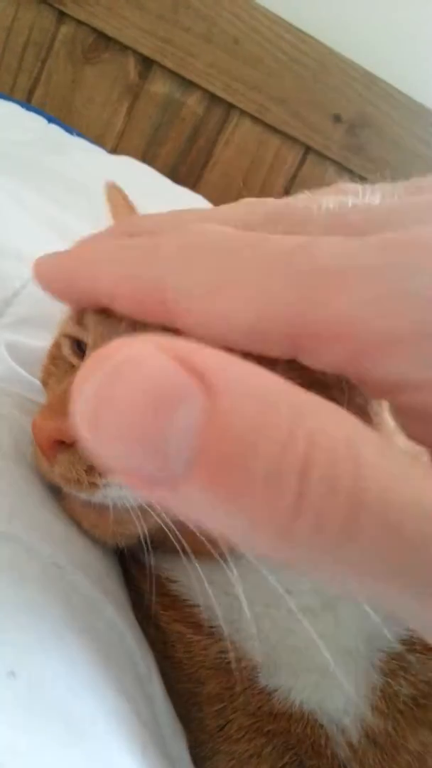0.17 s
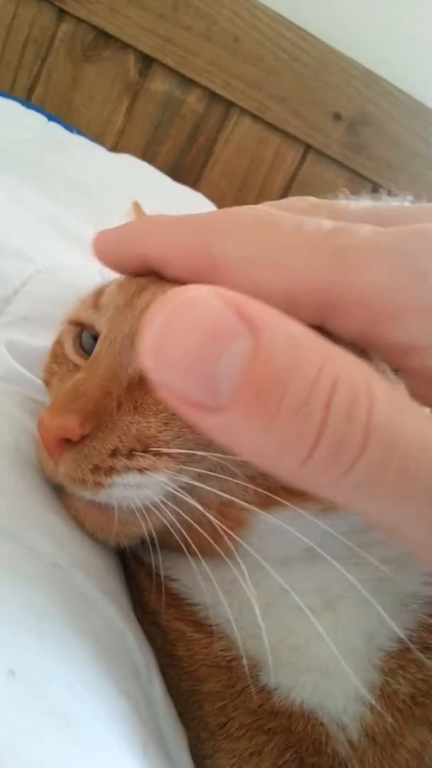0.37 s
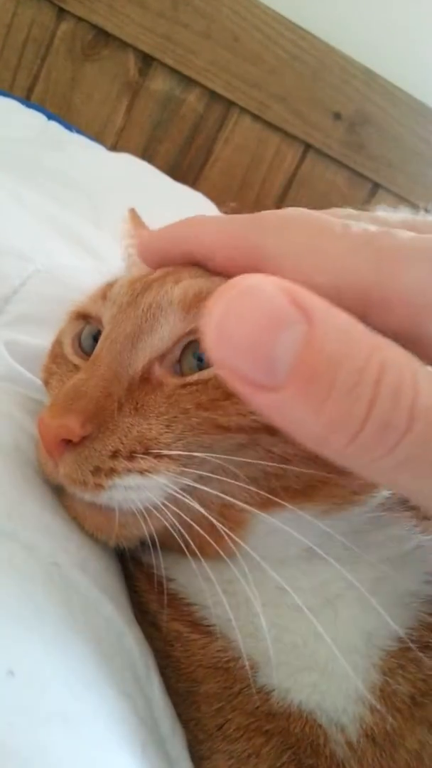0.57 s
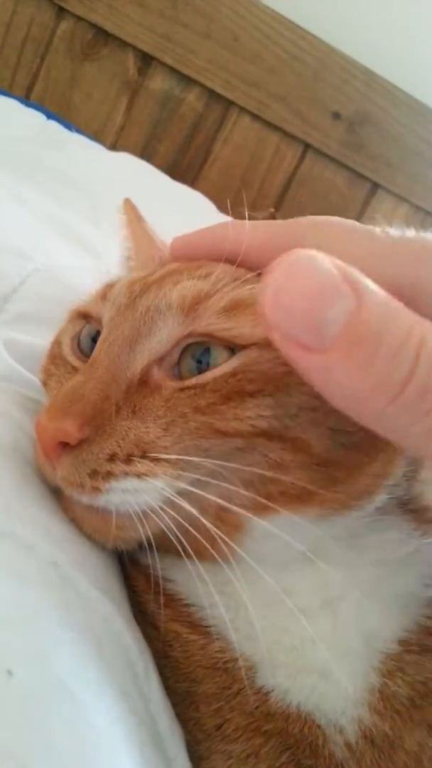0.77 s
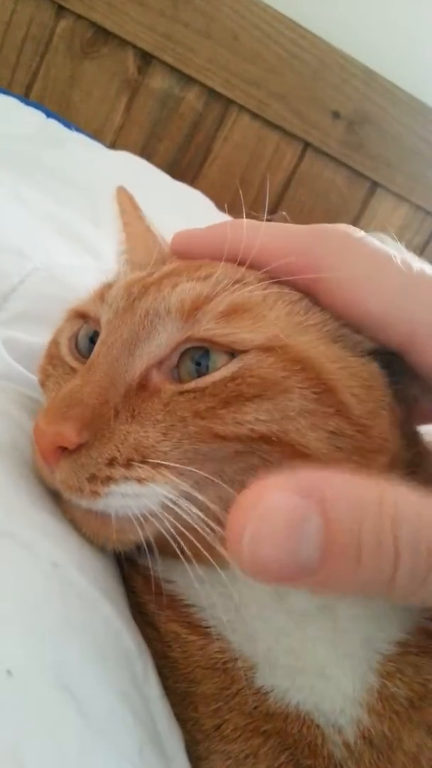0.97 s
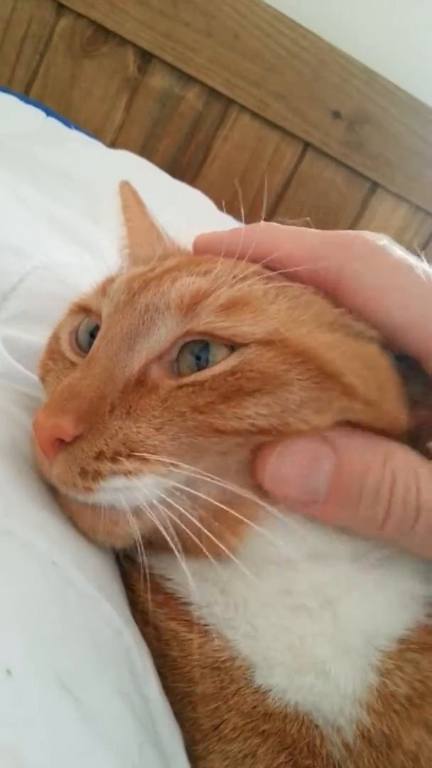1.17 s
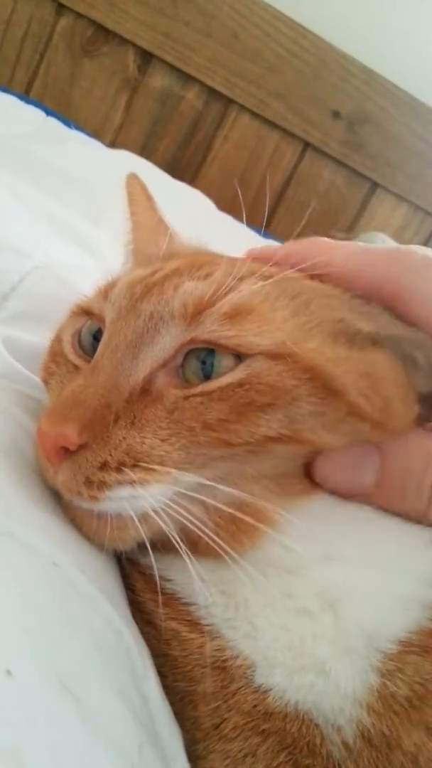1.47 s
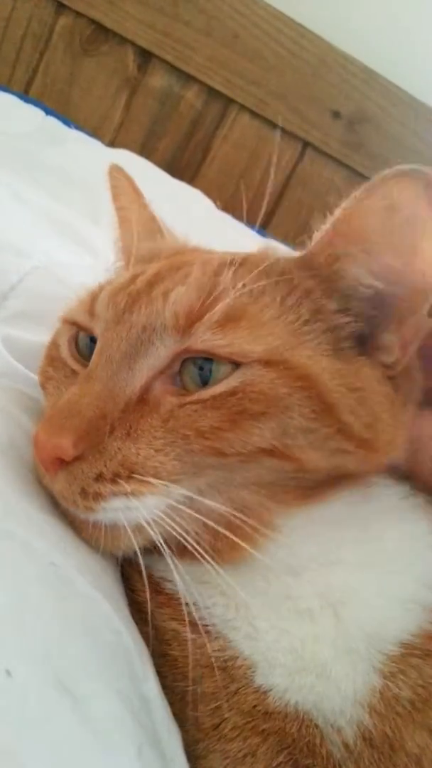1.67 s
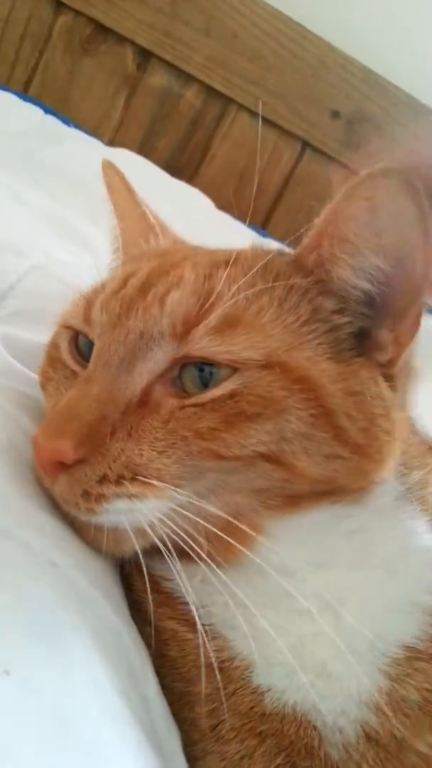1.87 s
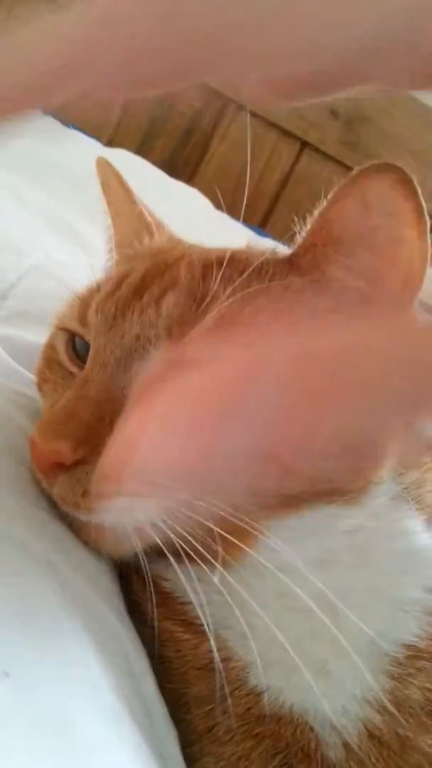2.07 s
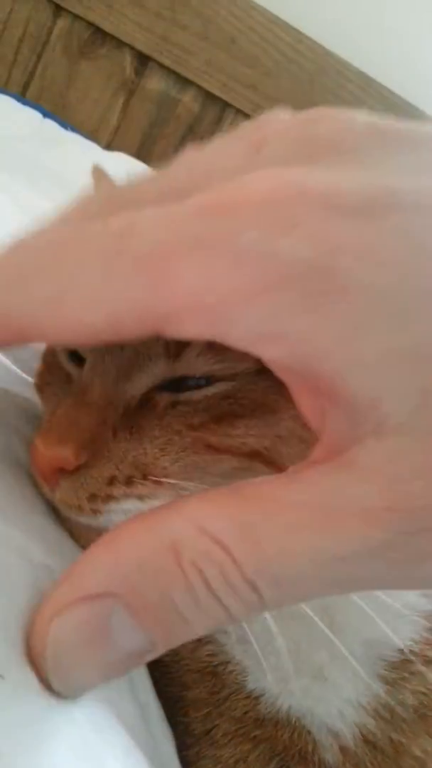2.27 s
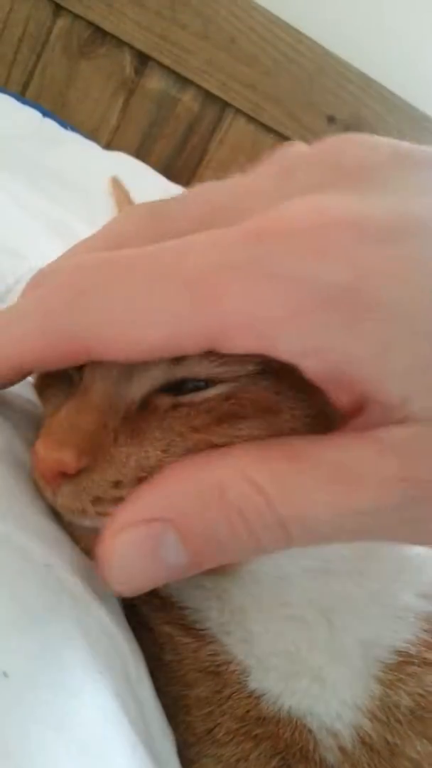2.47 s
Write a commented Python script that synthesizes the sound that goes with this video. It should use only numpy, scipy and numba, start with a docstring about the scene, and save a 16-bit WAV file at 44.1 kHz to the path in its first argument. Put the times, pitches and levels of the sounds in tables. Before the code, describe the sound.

Very close fur stroking indoors on a bed, almost all in the left channel: scratchy rustle over a soft skin rub, crackling clicks early, a sparser middle, then renewed rubbing, with faint low handling rumble and hiss.

```python
"""A close, dry rustle of fur comes first, at the left: a hand strokes a cat's head on a bed, brushing that port.
Dense hair slips make the rustle and a lower skin rub, both swelling and thinning with the strokes.
Single hairs tick as resonant pulses, a few snap and ring the casing; the rubbing also gives short low thumps,
murmurs and a squeak, made as decaying tones that sink in pitch.
The right port hears a faint share of this; under it lie handling rumble, a low hum, port hiss and a light brush."""
import sys
import numpy as np
from scipy import signal
from scipy.fft import rfft, irfft
from scipy.io import wavfile
from numba import njit

SR = 44100
rng = np.random.default_rng(int(sys.argv[2]) if len(sys.argv) > 2 else 0)


def dump(signal):
    """Clip the signal to [-1, 1] and save it as 16-bit WAV at the path in sys.argv[1]."""
    limited = np.clip(np.atleast_2d(signal).T, -1, 1)
    pcm = np.round(limited * 32767).astype(np.int16)
    wavfile.write(sys.argv[1], SR, pcm)


N = 114660  # samples, 2.6 s

# Strokes of the hand, before the two trims: time_s, rustle_level_db, skin_level_db
STROKES = [(0.0, -42.5, -51), (0.036, -49, -63), (0.1, -40, -53), (0.144, -38.5, -47.5), (0.192, -41, -53),
           (0.208, -35, -45), (0.255, -48, -56), (0.315, -33, -41), (0.359, -55.5, -56),
           (0.371, -47.5, -52.5), (0.423, -49.5, -63.5), (0.451, -45.5, -55), (0.463, -41, -30.5),
           (0.479, -46.5, -49.5), (0.507, -45.5, -63), (0.539, -41.5, -57), (0.559, -35, -38),
           (0.591, -36, -46), (0.643, -58, -62.5), (0.662, -55, -69), (0.694, -34.5, -40.5),
           (0.738, -43, -53), (0.794, -30, -35.5), (0.854, -45, -58.5), (0.874, -53, -51),
           (0.902, -41.5, -52.5), (0.934, -31.5, -41.5), (0.974, -44.5, -59), (1.002, -42.5, -69),
           (1.026, -39, -41.5), (1.06, -42, -53.5), (1.09, -59, -85), (1.117, -41, -56.5),
           (1.209, -36.5, -46), (1.27, -49, -57), (1.297, -44.5, -64), (1.345, -47.5, -72),
           (1.397, -43.5, -52), (1.405, -43, -37.5), (1.413, -47.5, -49), (1.449, -55.5, -65),
           (1.465, -47.5, -62), (1.513, -64, -79), (1.548, -46, -59.5), (1.578, -53.5, -64),
           (1.594, -38.5, -57), (1.652, -37, -48), (1.716, -44, -61), (1.75, -38.5, -54), (1.789, -33, -58),
           (1.806, -36.5, -43.5), (1.845, -43.5, -55.5), (1.885, -37.5, -46), (1.925, -44.5, -55),
           (1.99, -39.5, -50), (2.05, -42, -54), (2.09, -34.5, -42.5), (2.14, -39.5, -48),
           (2.172, -32, -37.5), (2.22, -38, -47), (2.275, -32.5, -40), (2.3, -34.5, -44),
           (2.375, -44.5, -55.5), (2.43, -48.5, -57), (2.5, -44.5, -56.5), (2.55, -41.5, -46),
           (2.598, -43.5, -52.5)]
FUR_TRIM_DB, SKIN_TRIM_DB = -0.5, 1.5
# Tiny hair slips; each is louder than the least by a random amount with this scale
SLIPS_PER_S, SLIP_SPREAD_DB = 8000., 4.5
# Unsteady catching shared by fur and skin, and a further judder of the skin (rates in wander points per s)
CATCH_DB, CATCH_RATE = 2.0, 130.
JUDDER_DB, JUDDER_RATE = 2.5, 70
# Colours of the fur rustle and of the skin rub: freq_hz, density_db (relative, per Hz)
FUR_COLOUR = [(700, -28.5), (1300, -8.5), (1900, -2.5), (2600, -1), (4000, -3), (6200, -1), (7500, -6.5),
              (9000, -14.5), (12000, -18.5), (14500, -32)]
SKIN_COLOUR = [(30, -17.5), (90, -1.5), (200, -2), (380, 1), (650, -3.5), (900, -4), (1400, -4.5),
               (2500, -4.5), (6000, -36.5)]
# Small air gaps squeezed by the rubbing: pitch_hz, level_db
AIR_GAPS = [(3100, -7.5), (4000, -3.5), (5800, -6)]
GAP_Q, GAP_DRIFT, AIR_RATE = 7.2, 0.13, 12  # drift as log pitch; wander points per s
# Hollow of the cupped hand, its share against the fur: time_s, level_db
CUP_SHARE = [(0, -33), (1.5, -10), (1.7, -12), (1.85, -0.5), (2.1, -3), (2.28, -11), (2.6, -12)]
# Resonances of that hollow: pitch_hz, q, level_db
CUP_MODES = [(612, 9.9, -8.5), (1360, 3.3, -10), (2310, 3.4, 1.5)]
# Treble hiss of the rubbing against the fur: time_s, level_db
SHEEN_LEVEL = [(.45, -9), (.62, -8.5), (.95, -11.5), (1.2, -8), (1.6, -7), (1.9, -43), (2.2, -10),
               (2.6, -6)]
# Colour of that hiss: freq_hz, density_db (relative, per Hz)
SHEEN_COLOUR = [(3500, -41), (6800, 3), (9000, 0), (12000, -4), (14500, -10.5)]
# Lesser hair ticks scattered through the rustle; level is the peak against the rustle
CRACKLES_PER_S, CRACKLE_DB, CRACKLE_HZ = 70., 14.5, 5360

# Single hairs flicking free: start_s, peak_db, pitch_hz, knock_db (dull knock against the tick)
TICKS = [(0.203, -17.5, 4440, -17), (0.2086, -15.5, 4400, -35), (0.2988, -19, 5800, -21),
         (0.307, -18, 3500, -32), (0.3104, -18, 5230, -17), (0.3309, -15.5, 4240, -35),
         (0.3325, -14, 4600, -37), (0.467, -17, 3770, -17), (0.4695, -12.5, 4200, -10),
         (0.5568, -6, 5800, -2), (0.5586, -4.5, 6100, 9), (0.5645, -12, 3370, -19), (0.605, -16, 5750, 8),
         (0.676, -23, 4470, -16), (0.6926, -9.5, 6400, -2.5), (0.7073, -19.5, 4230, -26),
         (0.718, -22, 6000, -15), (0.7618, -3, 5800, 4), (0.7678, -5.5, 6150, -3), (0.7891, -11, 5700, -29),
         (0.7966, -10, 6100, -13), (0.8162, -18, 3500, -18), (0.8614, -26, 5030, -24),
         (0.869, -10.5, 5700, -2), (0.9041, -22, 4700, -18), (0.9206, -21, 4740, -7),
         (0.93, -7.5, 6200, 4.5), (0.9347, -13, 6000, -5), (0.9377, -17, 2800, -19),
         (1.0257, -16.5, 3560, -27), (1.0477, -9.5, 5700, 5), (1.116, -26, 5060, -12),
         (1.1874, -19.5, 6240, -21), (1.21, -18.5, 3280, 12), (1.2515, -18, 7100, -26),
         (1.5534, -30.5, 2920, -25), (1.6984, -25, 3770, -24), (1.7692, -21, 4400, -25),
         (1.807, -15, 5540, -26), (1.8967, -8.5, 4340, 8), (2.008, -12.5, 5060, -26),
         (2.0901, -16.5, 6500, -8), (2.1126, -18, 5030, -20), (2.166, -11, 4930, 8),
         (2.195, -13.5, 6800, -28), (2.2401, -18, 5570, -26), (2.2655, -14.5, 5630, -1),
         (2.2736, -7.5, 5750, -10), (2.2943, -17, 4430, -3), (2.3415, -13.5, 4600, -1.5)]
TICK_Q, KNOCK_HZ = 1.48, 1210
# Stiffer hairs that snap: start_s, peak_db (without the ring), pitch_hz, ring_db
SNAPS = [(0.4575, -1, 5100, -7), (.45808, -6, 4630, 5), (0.4586, -1.5, 4600, 1), (.8737, -4, 4140, 0.5),
         (1.3586, -24, 5400, 11), (1.4011, -1, 4130, 1), (1.464, -18, 6100, 4), (1.9953, -26, 2820, 7)]
SNAP_Q, SNAP_KNOCK_DB, SNAP_DULL_HZ = 0.98, -29.5, 8000
# Modes of the recorder's casing: pitch_hz, level_db
CASING_MODES = [(960, 10), (1400, 6), (1950, 10), (2280, 4), (2650, 3.5), (3280, -14), (5350, -1.5),
                (6250, 0.5)]
RING_T60_S = 0.014  # time for each mode to fall 60 dB

# Short low thumps, murmurs and a squeak from the rubbing: start_s, level_db, pitch_hz (where the tone settles)
RUB_TONES = [(.273, -34, 590), (.461, -26, 185), (.4625, -25, 587), (.465, -30.5, 354), (0.474, -33, 210),
             (.696, -40, 181), (0.875, -35.5, 390), (.925, -40.5, 98), (1.403, -31.5, 367),
             (1.754, -31.5, 590), (2.064, -34, 380)]
TONE_RISE_CYCLES, TONE_FALL_CYCLES = 0.33, 7.1  # rise time constant; fall by 60 dB
TONE_SAG = 0.14  # share by which the pitch starts high

# Faint share of the left-side touch at the right port
RIGHT_RUB_DB, RIGHT_TICK_DB = -46, -32

# Grip on the recorder, before the rumble and hum trims: time_s, level_db
GRIP = [(.06, -67.5), (.3, -57.5), (.43, -66.5), (.58, -56.5), (.66, -67.5), (1.04, -54), (1.1, -65.5),
        (1.47, -58.5), (1.515, -77), (1.62, -58), (1.79, -58), (1.94, -63), (2.2, -55.5), (2.41, -71),
        (2.6, -61.5)]
# Colour of the handling rumble: freq_hz, density_db (relative, per Hz)
RUMBLE_COLOUR = [(20, -9.5), (60, -2), (100, -5), (200, -4), (300, -10.5), (430, -9.5), (650, -21.5),
                 (2000, -33), (8000, -46)]
RUMBLE_TRIM_DB, HUM_HZ, HUM_TRIM_DB, HISS_DB = -1, 63, -2, -72.5
# Colour of the ports, for hiss and brush: freq_hz, density_db (relative, per Hz)
PORT_COLOUR = [(300, -19), (900, -12.5), (2000, -10.5), (4500, -13), (6300, -6.5), (7350, 2), (8500, -10.5),
               (11000, -12.5), (14500, -13)]
# Hand brushing the right port; the end levels hold outside these times: time_s, level_db
BRUSH = [(2.245, -55.5), (2.28, -43.5), (2.38, -48.5), (2.44, -45.5), (2.5, -55.5)]
# The hiss level dips briefly
DIP_S, DIP_WIDTH_S, DIP_DB = 1.52, 0.022, -12
CLIP_LEVEL, TOP_HZ = 0.88, 14500


def rubbing():
    """Slips through fur, air gaps and cupped hand, over a lower skin rub; all catch and release together."""
    fur_gain, skin_gain = curve(STROKES)
    catch = undb(CATCH_DB * walk(CATCH_RATE))
    skin = colour(slips() * catch, SKIN_COLOUR) * undb(JUDDER_DB * walk(JUDDER_RATE))
    rustle = fur_rustle(catch) + crackle()
    return undb(FUR_TRIM_DB) * fur_gain * rustle + undb(SKIN_TRIM_DB) * skin_gain * skin


def fur_rustle(catch):
    """Coloured slips, joined by resonances of moving air pockets and a treble sheen."""
    sheen, = curve(SHEEN_LEVEL)
    cup, = curve(CUP_SHARE)
    gaps = sum(undb(db) * air_pocket(catch, hz, GAP_Q, GAP_DRIFT) for hz, db in AIR_GAPS)
    fur = unit(colour(slips() * catch, FUR_COLOUR) + gaps)
    hollow = sum(undb(db) * air_pocket(catch, hz, q, 0.053) for hz, q, db in CUP_MODES)
    treble = colour(slips() * catch, SHEEN_COLOUR)
    # keep the level about steady as the shares change
    return (fur + cup * hollow + sheen * treble) / np.sqrt(1 + cup ** 2 + sheen ** 2)


def air_pocket(catch, hz, q, drift):
    """Slips heard through one wandering air resonance; rms 1."""
    centre = hz * np.exp(drift * walk(AIR_RATE))
    return unit(resonate(slips() * catch, centre, float(q)))


def slips():
    """Countless tiny stick-slips: random impulses of uneven size and either sign."""
    hit = rng.random(N) < SLIPS_PER_S / SR
    size = undb(SLIP_SPREAD_DB * np.minimum(rng.exponential(size=N), 5.5))
    return hit * size * rng.choice([-1, 1], N)


def crackle():
    """Lesser hairs let go at random moments, each a small flick of random size and sign."""
    hit = rng.random(N) < CRACKLES_PER_S / SR
    catches = hit * rng.uniform(-1.08, 1, N)
    return undb(CRACKLE_DB) * np.convolve(catches, flick(CRACKLE_HZ, TICK_Q, SNAP_KNOCK_DB))[:N]


def hairs():
    """Single hairs tick; stiffer ones snap, a little duller, and set the casing ringing."""
    out = np.zeros(N)
    for start, db, hz, knock_db in TICKS:
        add(out, start, undb(db) * flick(hz, TICK_Q, knock_db))
    dull = signal.butter(2, SNAP_DULL_HZ, fs=SR, output="sos")
    for start, db, hz, ring_db in SNAPS:
        snap = signal.sosfilt(dull, flick(hz, SNAP_Q, SNAP_KNOCK_DB))
        sound = snap + undb(ring_db) * casing_ring(snap)
        add(out, start, undb(db) * sound / abs(snap).max())
    return out


def flick(hz, q, knock_db):
    """One hair letting go: a brief resonance at its pitch over a duller knock; peak 1."""
    push = signal.unit_impulse(1024)
    tick = band(push, hz, q)
    knock = resonate(push, np.full(len(push), float(KNOCK_HZ)), 0.3)
    y = tick / abs(tick).max() + undb(knock_db) * knock / abs(knock).max()
    return y / abs(y).max()


def casing_ring(snap):
    """The snap drives the casing's modes, whose Q follows from their common decay time."""
    ring = np.zeros(len(snap))
    for hz, db in CASING_MODES:
        q = np.pi * hz * RING_T60_S / np.log(1000)
        ring += undb(db) * resonate(snap, np.full(len(snap), float(hz)), q)
    return ring


def rub_tones():
    """Short low thumps, murmurs and a squeak from the rubbing: decaying tones that sink in pitch."""
    out, t = np.zeros(N), np.arange(SR // 5) / SR
    for start, db, hz in RUB_TONES:
        fade = np.exp(-np.log(1000) * t * hz / TONE_FALL_CYCLES)
        swell = fade * (1 - np.exp(-t * hz / TONE_RISE_CYCLES))
        phase = 2 * np.pi * np.cumsum(hz * (1 + TONE_SAG * fade)) / SR
        add(out, start, undb(db) * swell / swell.max() * np.sin(phase))
    return out


def right_brush():
    """A light brush of the hand: slips coloured by the right port."""
    level, = curve(BRUSH)
    return level * colour(slips(), PORT_COLOUR)


def handling_rumble(grip):
    """Trembling low noise following the grip, partly shared between the two ports."""
    shared = rng.standard_normal(N)
    tremble = undb(3.6 * walk(55))
    ports = [colour(shared + 0.57 * rng.standard_normal(N), RUMBLE_COLOUR) for _ in range(2)]
    return np.array(ports) * grip * tremble * undb(RUMBLE_TRIM_DB)


def low_hum(grip):
    """A low sine, wandering in level and phase, equal at both ports and following the grip."""
    t = np.arange(N) / SR
    level = undb(HUM_TRIM_DB + 2.0 * walk(4.95))
    return grip * level * np.sin(2 * np.pi * HUM_HZ * t + .5 * walk(5.54))


def port_hiss():
    """Independent coloured noise at each port, with one brief dip in level."""
    t = np.arange(N) / SR
    dip = undb(DIP_DB * np.exp(-((t - DIP_S) / DIP_WIDTH_S) ** 2))
    ports = [colour(rng.standard_normal(N), PORT_COLOUR) for _ in range(2)]
    return dip * undb(HISS_DB) * np.array(ports)


def background():
    """Rumble, hum and hiss at both ports, with the light brush added on the right."""
    grip, = curve(GRIP)
    brush = np.array([np.zeros(N), right_brush()])
    return handling_rumble(grip) + low_hum(grip) + port_hiss() + brush


def undb(db):
    """Decibels to gain."""
    return 10 ** (np.asarray(db) / 20)


def unit(x):
    """Scale to rms 1."""
    return x / np.sqrt(np.mean(x ** 2))


def curve(rows):
    """Gain over time for each dB column of a table."""
    times, *cols = np.array(rows, float).T
    return [undb(np.interp(np.arange(N) / SR, times, c)) for c in cols]


def colour(x, points):
    """Causal minimum-phase filter through (Hz, dB) points; rms 1."""
    hz, db = np.array(points, float).T
    f = np.maximum(np.fft.rfftfreq(N, 1 / SR), 1)
    log_gain = np.log(undb(np.interp(np.log(f), np.log(hz), db)))
    cepstrum = irfft(log_gain, N)
    # folding the cepstrum forward in time makes the filter causal
    cepstrum[1:N // 2] *= 2
    cepstrum[N // 2 + 1:] = 0
    return unit(irfft(rfft(x) * np.exp(rfft(cepstrum)), N))


def walk(rate):
    """Random wander of rms 1, in straight lines between `rate` points per second."""
    knots = rng.standard_normal(4096)
    return unit(np.interp(np.arange(N) / SR * rate, np.arange(len(knots)), knots))


@njit
def resonate(x, hz, q):
    """Band-pass (state-variable filter) whose centre may move."""
    y, band_state, low_state = np.empty(len(x)), 0., 0.
    for i in range(len(x)):
        g = np.tan(np.pi * min(hz[i], .45 * SR) / SR)
        v = (band_state + g * (x[i] + 1e-18 - low_state)) / (1 + g * (g + 1 / q))
        band_state = 2 * v - band_state
        low_state += 2 * g * v
        y[i] = v / q
    return y


def band(x, hz, q):
    """A fixed resonance applied twice, for steep sides."""
    centre = np.full(len(x), float(hz))
    return resonate(resonate(x, centre, float(q)), centre, float(q))


def add(out, start, sound):
    """Mix a sound in at a time in seconds."""
    i = int(start * SR)
    out[i:i + len(sound)] += sound[:N - i]


def scene():
    """The touch is at the left port; a faint share reaches the right."""
    rub = rubbing() + rub_tones()
    ticks = hairs()
    left = rub + ticks
    right = undb(RIGHT_RUB_DB) * rub + undb(RIGHT_TICK_DB) * ticks
    return np.array([left, right]) + background()


def record(dry):
    """The recorder clips near full scale, then cuts the top steeply."""
    low_pass = signal.ellip(8, .2, 70, TOP_HZ, fs=SR, output="sos")
    return signal.sosfilt(low_pass, np.clip(dry, -CLIP_LEVEL, CLIP_LEVEL))


dry = scene()
out = record(dry)
dump(out)
```